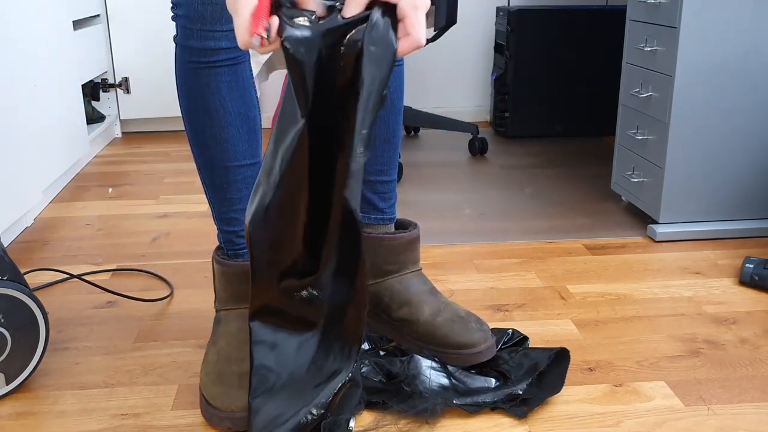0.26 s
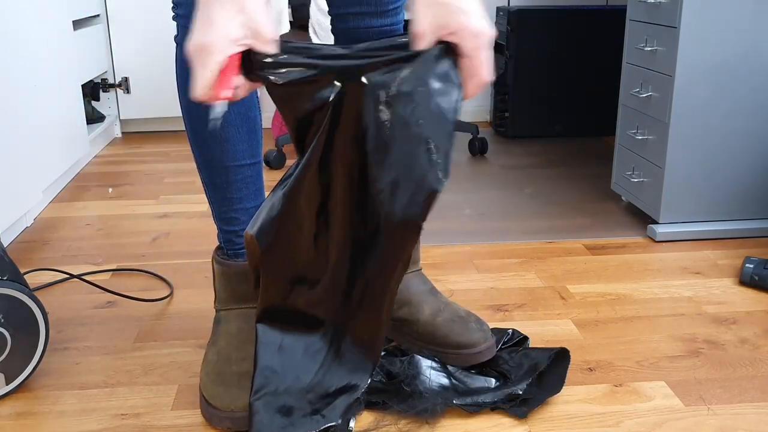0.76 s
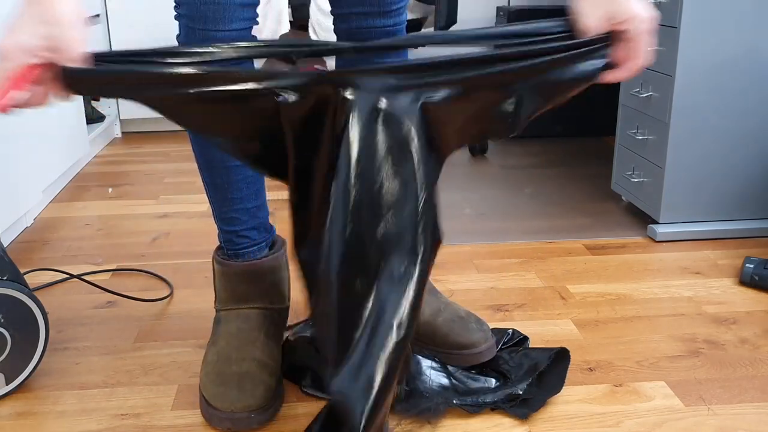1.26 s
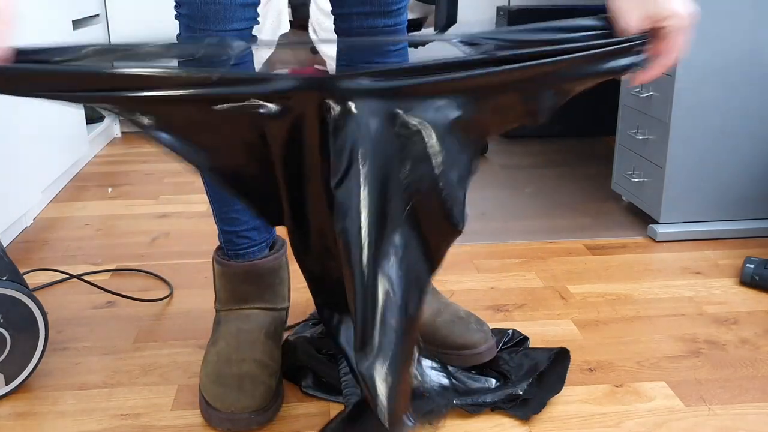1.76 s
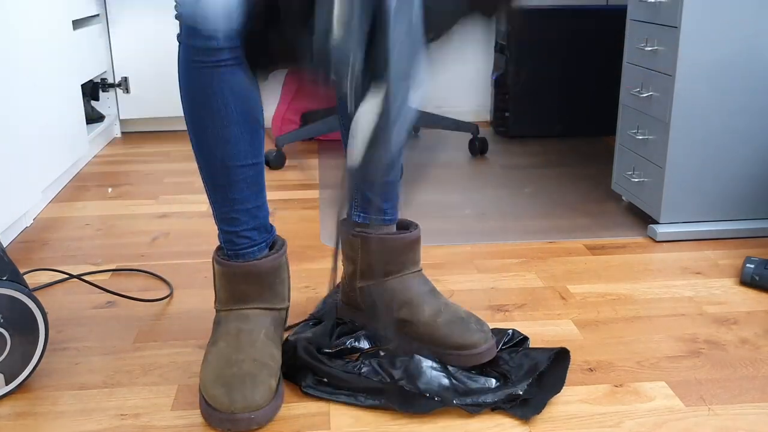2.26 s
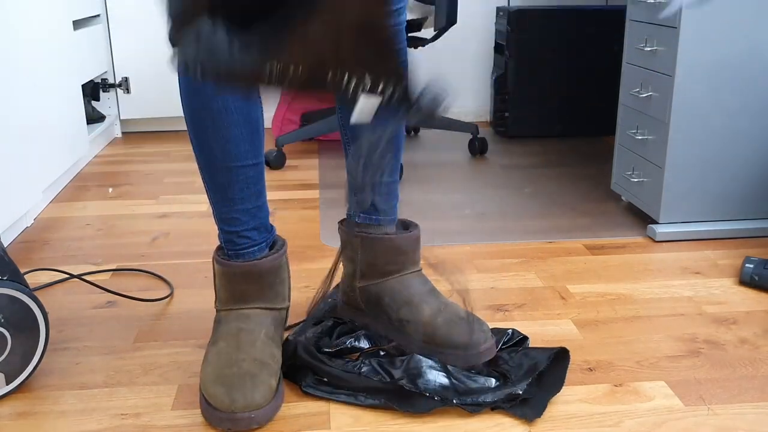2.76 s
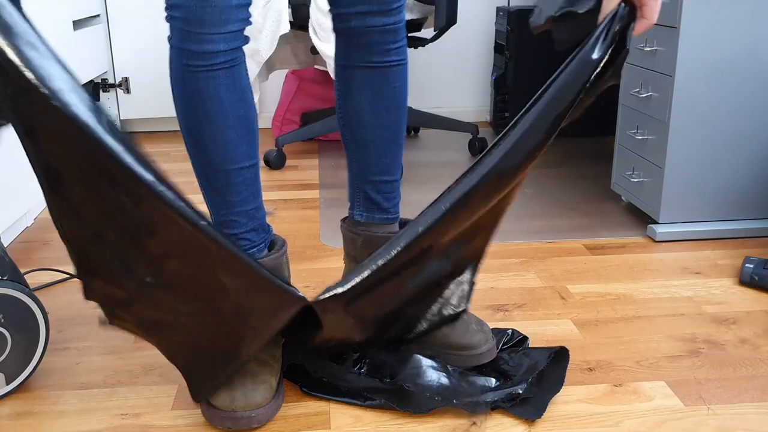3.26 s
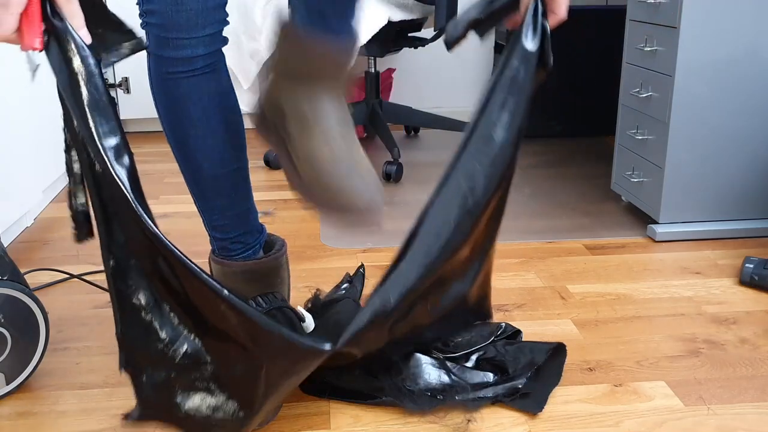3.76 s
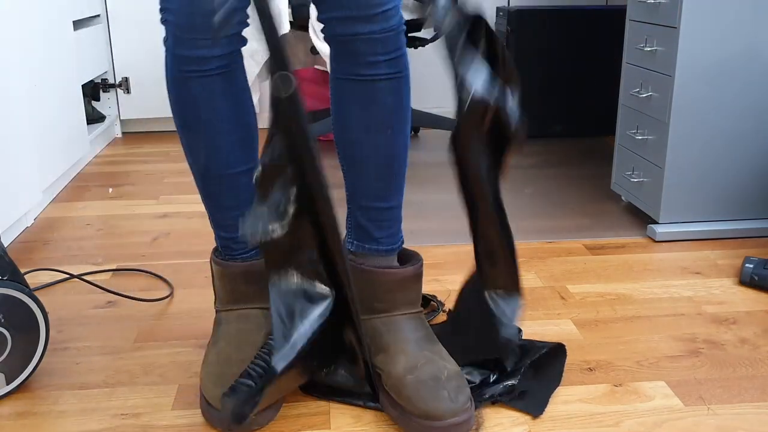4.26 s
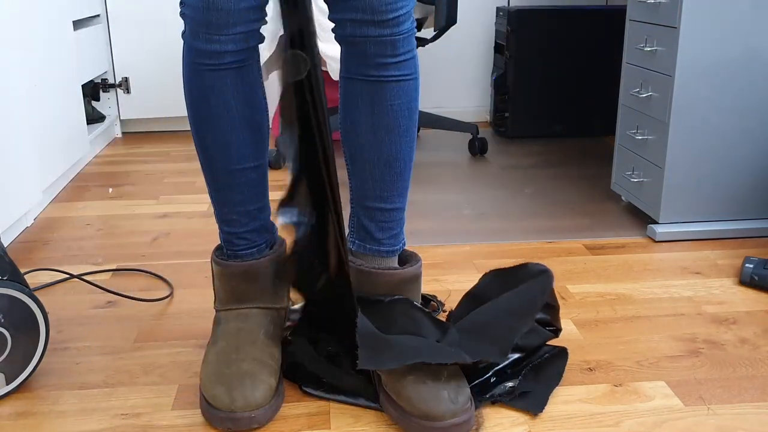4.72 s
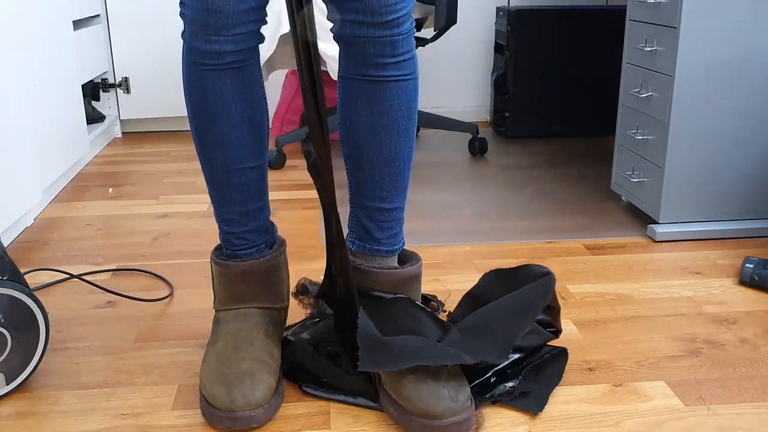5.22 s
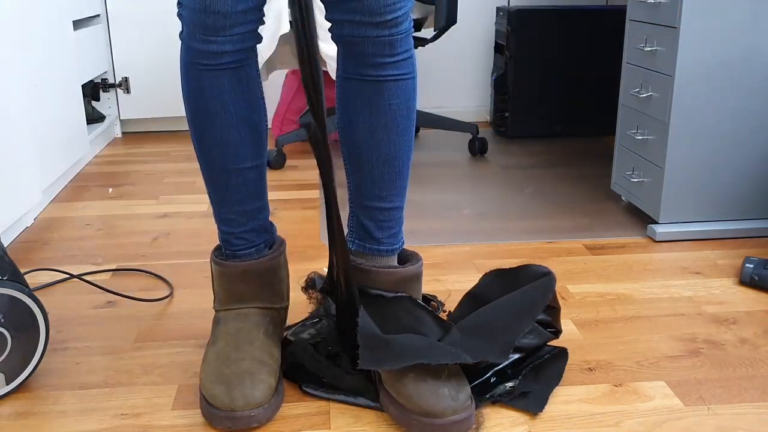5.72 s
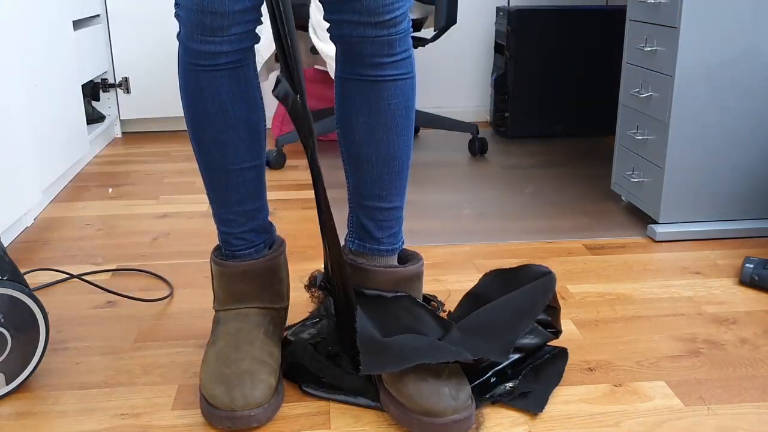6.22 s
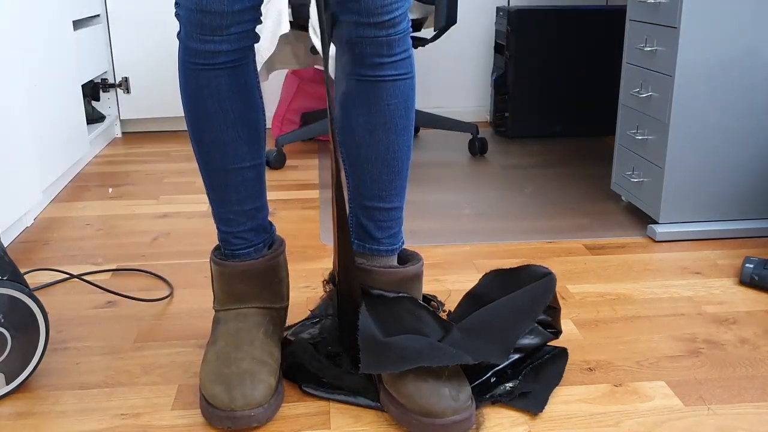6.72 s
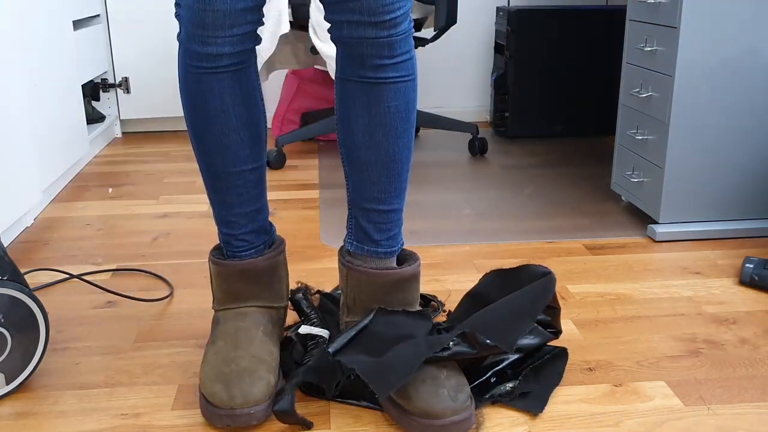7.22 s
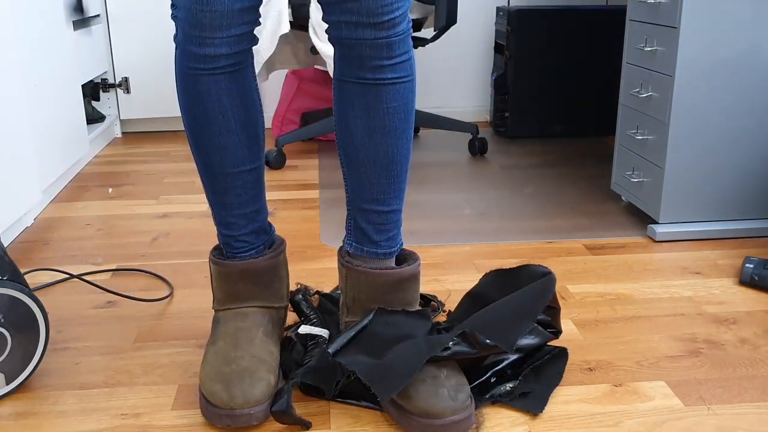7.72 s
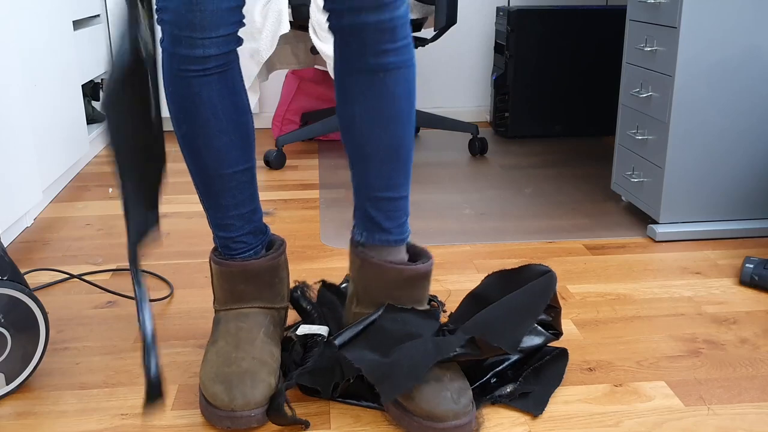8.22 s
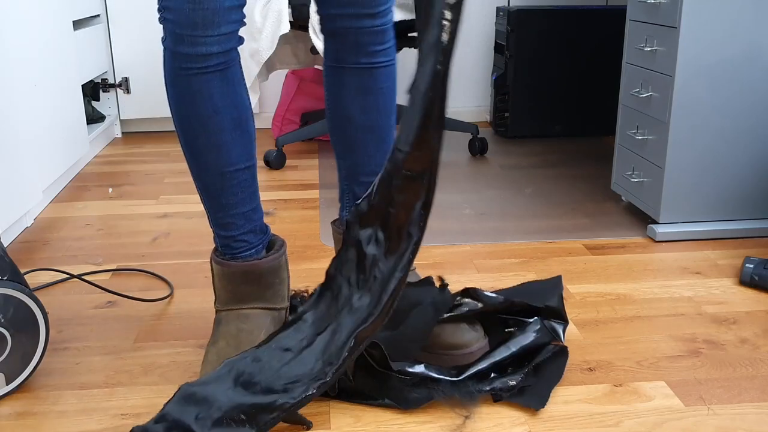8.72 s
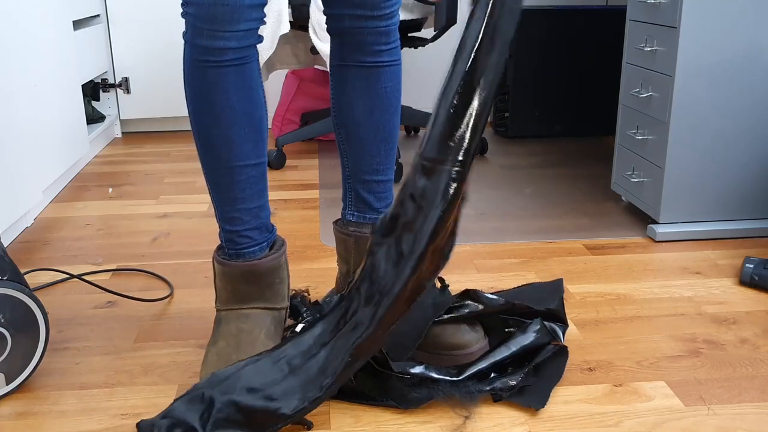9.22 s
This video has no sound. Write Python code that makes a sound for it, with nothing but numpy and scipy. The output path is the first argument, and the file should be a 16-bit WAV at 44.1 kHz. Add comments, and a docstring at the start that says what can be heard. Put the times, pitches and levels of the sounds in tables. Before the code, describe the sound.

Close stereo pickup in a small quiet room. Taut shiny fabric tears in several quick, bright, raspy rips with sharp snaps, then pauses with faint rustling. A boot thuds softly on floorboards, and a seam is pulled apart in dense, uneven cracks that thin out. A few creaky tugs lead to a last hard rip, followed by near silence and light cloth rustles and flicks.

```python
"""In a small, quiet room with a wooden floor, shiny coated fabric is ripped apart by hand.
Rips and seams: dense random thread clicks filtered by the taut sheet. Snaps: single millisecond noise bursts.
Folds flick as short band-passed pops; loose cloth rustles as clumped clicks.
Two faint soft knocks and a boot thud are decaying sines; low floor boom follows the pulls.
Reflections, standing waves and steady air noise make the room."""
import sys
import numpy as np
from scipy import signal
from scipy.fft import rfft, irfft
from scipy.io import wavfile
from scipy.ndimage import map_coordinates

SR = 44100
rng = np.random.default_rng(int(sys.argv[2]) if len(sys.argv) > 2 else 0)


def transcribe(signal):
    """Save signal, clipped to [-1, 1], as a 16-bit WAV file at the path in sys.argv[1]."""
    frames = np.atleast_2d(signal).T
    limited = np.clip(frames, -1, 1)
    pcm = np.round(limited * 32767).astype(np.int16)
    wavfile.write(sys.argv[1], SR, pcm)


N = 418068
TIME_S = np.arange(N) / SR

# Levels in the tables are relative; the layers apply further gains.
# room noise spectrum: freq_hz, level_db
AIR_SPECTRUM = [(12, -42), (20, 2), (65, -3), (124, -14.5), (224, -23), (440, -17), (599, -6.5),
                (863, -21.5), (1320, -13.5), (2440, -20), (6170, -22.5), (8170, -35), (9670, -34),
                (14700, -42.5), (16500, -55.5)]
# decay of the reflections: freq_hz, t60_s
ROOM_DECAY = [(100, 0.23), (260, 0.31), (700, 0.26), (1840, 0.27), (4850, 0.28), (12800, 0.23)]
# likeness of the reverberant sound and air, left to right: freq_hz, likeness_0_to_1
LEFT_RIGHT_LIKENESS = [(60, 0.68), (300, 0.65), (600, 0.49), (1200, 0), (4000, 0.0067), (14000, 0)]
# standing waves of the room: freq_hz, width_hz, gain_db
STANDING_WAVES = [(62, 1.7, 0.5), (182.3, 18, -9.5), (544, 65, -12.5)]
# microphone colour: freq_hz, gain_db
MICROPHONE = [(20, -11.5), (42, 1.5), (5200, -1), (6800, 1), (7900, -3), (10000, 0), (16000, 0)]
# two faint soft knocks, then a boot thud: start_s, level_db
KNOCKS_AND_THUD = [(2.93, -44.5), (3.063, -41), (4.034, -16)]
# modes of the floorboards: freq_hz, level_db, t60_s
FLOORBOARDS = [(66, -26, 0.14), (191, -6.5, 0.033), (388, 10.5, 0.014), (498, -7, 0.016)]
# loose cloth sliding and creasing: fastest_s, build_s, fade_s, creases_db, rasp_re_creases_db,
# flutter_re_creases_db
RUSTLES = [(0.2, 0.44, 0.071, -49.5, -5, -13), (0.38, 0.08, 0.22, -47, 0, -12),
           (0.6, 0.099, 0.12, -51.5, -1, -2), (2.72, 0.13, 0.18, -60.5, -1, 1.5),
           (2.98, 0.42, 0.21, -55.5, -2, -1.5), (3.37, 0.067, 0.19, -54.5, -2.5, -10.5),
           (3.93, 0.093, 0.18, -47, 7, -4.5), (4.08, 0.14, 0.06, -42, -1.5, 6),
           (5.56, .04, 0.2, -52.5, -6, -4.5), (5.98, 0.073, 0.19, -37.5, -6.5, -17),
           (6.27, 0.033, 0.066, -33.5, -8.5, -14), (7.11, 0.17, 0.15, -51.5, -9.5, -13),
           (7.41, 0.15, 0.091, -58.5, -11, -20), (7.52, 0.068, 0.044, -59.5, -2, -13),
           (8.151, 0.14, 0.34, -63.5, 7, -1.5), (8.39, 0.23, 0.086, -48.5, -5.5, -6),
           (8.559, 0.057, 0.15, -55.5, -0.5, 0.5), (9.12, 0.022, 0.16, -60, -6, -6),
           (9.23, 0.034, 0.19, -54, 2, -0.5), (9.409, 0.065, 0.03, -34, -1, -8.5)]
# spectrum of creasing cloth: freq_hz, level_db
CREASING_SPECTRUM = [(35, -32.5), (60, -4.5), (140, -15), (384, -3.5), (432, -3.5), (777, -5), (854, -5),
                     (1610, -5), (6010, -14), (7960, -22), (15000, -27.5), (16500, -42.5)]
# folds flicking over or jerking taut: start_s, level_db, centre_hz
FLICKS = [(0.344, -40, 2200), (0.634, -16.5, 1007), (1.101, -14.5, 980), (1.746, -15.5, 520),
          (3.064, -36, 894), (3.421, -37, 840), (3.946, -19, 920), (4.155, -14, 770), (6.494, -10.5, 780),
          (7.972, -43.5, 2700), (8.047, -35, 1600), (8.315, -31, 2400), (9.102, -41.5, 1560),
          (9.203, -22.5, 1600), (9.358, -22.5, 1300), (9.371, -19, 1300)]
# stitches and strong threads bursting: start_s, level_db, rasp_re_crack_db
SNAPS = [(0.498, -32, -19), (0.635, -11.5, -16), (0.6714, -16, -6), (0.6995, -13.5, -6), (0.7192, -13, -1),
         (1.0935, -21.5, -12), (1.1005, -12, -4), (1.1505, -15.5, 0), (1.518, -16.5, -6), (1.7185, -14, -1),
         (1.746, -7.5, -1), (1.864, -6.5, -15), (1.893, -3.5, -25), (2.0631, -7.5, -17.5),
         (2.0856, -3.5, -16), (2.1025, -4.5, -22), (2.501, -7.5, -15), (2.5551, -9.5, -20),
         (4.0637, -13.5, -7), (4.153, -2.5, -15), (4.1787, -17, -14), (4.2258, -15, 6.5),
         (4.2665, -12.5, -8), (4.343, -7.5, -1.5), (4.378, -8, -5.5), (4.4277, -7, -7.5), (4.4531, -5, -7),
         (4.5089, -8.5, -5), (4.5416, -11.5, 0), (4.566, -5.5, -9), (4.6073, -8.5, -2.5), (4.626, -4, -2.5),
         (4.6587, -6.5, -19), (4.691, -3.5, -17), (4.7067, -14.5, 4.5), (4.723, -13, -11),
         (4.7474, -6.5, -7.5), (4.7656, -16.5, 3.5), (4.7874, -11, -18), (4.805, -11, -9),
         (4.8204, -11, -7.5), (4.8663, -2.5, -7.5), (4.9075, -6.5, -6), (4.9641, -1, -14),
         (5.022, -10.5, -10), (5.0766, -6, -11), (5.105, -22, -14), (5.2167, -3.5, -10), (5.4193, -15, -8),
         (5.503, -15, -4), (5.683, -30, 4), (5.7248, -13.5, -8), (5.7842, -28.5, 1), (5.817, -30, 4),
         (5.857, -24, -6), (5.8717, -26.5, 5.5), (5.892, -6, -15.5), (6.0421, -11, -1.5),
         (6.2194, -28, 1.5), (6.255, -18, -18.5), (6.3947, -10.5, -9.5), (6.4242, -11.5, 0.5),
         (6.494, -5.5, -7), (6.5399, -0.5, -15), (6.662, -4, -8.5), (6.822, -4, -3.5), (6.8386, -10, -1)]
# spectrum of a bursting stitch: freq_hz, level_db
CRACK_SPECTRUM = [(40, -31), (200, -15.5), (700, -16), (1200, -17), (1600, -12.5), (2150, -8), (2700, -5.5),
                  (3900, 3.5), (6400, 4.5), (8200, -2), (15000, -6.5)]
# slow tears along a seam: start_s, length_s, threads_db, rasp_re_threads_db, flutter_re_threads_db,
# floor_boom_db
SEAMS = [(4.159, 0.19, -24.5, -4, -15, -54), (4.342, 0.26, -27.5, 1, -2.5, -46),
         (4.624, 0.18, -29, -2, -2, -44), (4.875, 0.063, -31.5, -20, -2.5, -45.5),
         (4.963, 0.068, -28.5, -2, -7.5, -45), (5.078, .11, -25.5, -9.5, -16.5, -40.5),
         (5.222, 0.036, -33.5, -20, -8.5, -40), (5.696, 0.23, -45.5, 1, -15, -64),
         (5.896, 0.03, -24, -10, -29.5, -51), (6.037, 0.065, -22, -24, -14, -43),
         (6.39, 0.17, -25.5, -14, -10, -51), (6.542, 0.051, -16.5, -13.5, -15, -38)]
# spectrum of a seam coming apart: freq_hz, level_db
UNPICKING_SPECTRUM = [(65, -33.5), (110, -4.5), (371, 0.5), (458, -1.5), (519, 0), (973, -5.5),
                      (1080, -5.5), (1680, -2.5), (6420, -8), (8090, -13.5), (15200, -13.5), (16500, -36.5)]
# fast rips across the sheet: start_s, length_s, threads_db, hardest_pull_0_to_1, rasp_re_threads_db,
# flutter_re_threads_db, floor_boom_db
RIPS = [(0.721, 0.21, -19, 0.53, -6, -13.5, -60.5), (1.145, .15, -20, 0.28, -9.5, -13, -53),
        (1.512, 0.089, -24, 0.1, -8, -14.5, -55), (1.717, 0.25, -18, 0.67, -11.5, -14, -56),
        (2.085, 0.19, -19.5, 0.2, -8.5, -11, -51), (2.493, 0.11, -31.5, .15, -10.5, -5, -49.5),
        (6.664, 0.17, -19, 0.53, -10, -11.5, -46.5), (6.818, 0.048, -19.5, 0.25, 1.5, -4, -32)]
# spectrum of the tearing weave: freq_hz, level_db
TEARING_SPECTRUM = [(24, -37.5), (40, -15.5), (201, -11.5), (245, -10.5), (386, -7), (1060, -4.5),
                    (1170, -1.5), (1580, -3.5), (5870, -4), (7950, -11.5), (14900, -16.5), (16500, -35.5)]
# gliding resonances during the first rip and the last two: time_s, pitch_hz, level_db
GLIDES = [
    [(0.727, 1500, -36), (0.775, 1250, -29.5), (0.83, 1020, -24), (0.88, 780, -39), (0.919, 620, -45)],
    [(6.67, 3100, -32.5), (6.76, 3250, -31), (6.815, 3100, -33), (6.84, 900, -31), (6.9, 620, -37)],
]

AIR_LEVEL_DB = -64
FLUTTER_HZ, RASP_HZ = 750, 2200  # flutter below, rasp between, crack above
EDGE_HZ = 16100  # band limit
# slack before and after a rip's hardest pull; rasp and flutter follow a share of it
RIP_BUILD_DB, RIP_RUN_OUT_DB, RIP_RUN_OUT_POWER, SHEET_FOLLOWS = 9.5, 11.5, 2.2, 0.99
SEAM_SAG_DB = 4.5  # tension lost over one tear
# drop one build before and one fade after the fastest moment; the power rounds the top
RUSTLE_DEPTH_DB, RUSTLE_POWER = 10.5, 1.09
# the floor lags a tug; moving loose cloth shifts weight in proportion to its flutter
FLOOR_LAG_S, SHIFT_DB = 0.034, -10


def amp(db):
    """Decibels to gain."""
    return 10 ** (np.asarray(db) / 20)


def unit(x):
    """Scales to rms 1."""
    return x / np.sqrt(np.mean(x ** 2) + 1e-20)


def read(points, hz):
    """Joins points by straight lines on a log-frequency axis."""
    f, value = np.transpose(points)
    return np.interp(np.log(hz + 1), np.log(f + 1), value)


def add(mix, start_s, sound):
    """Adds a sound to the mix in place, cut at the end of the mix."""
    part = mix[..., max(round(start_s * SR), 0):][..., :sound.shape[-1]]
    part += sound[..., :part.shape[-1]]


def wander(hz):
    """Random drift of rms 1: noise low-passed near hz."""
    f = np.fft.rfftfreq(N, 1 / SR)
    return unit(irfft(rfft(rng.standard_normal(N)) / (1 + (f / hz) ** 4), N))


def level(time_s, db):
    """Gain along a dB curve, practically silent outside it."""
    return amp(np.interp(TIME_S, time_s, db, left=-200, right=-200))


def pair(z, hz):
    """Mixes two unrelated spectra to the likeness of diffuse sound at two microphones."""
    same = np.clip(read(LEFT_RIGHT_LIKENESS, hz), -1, 1)
    return np.array([z[0], same * z[0] + np.sqrt(1 - same ** 2) * z[1]])


def shake(x, hz, width_hz):
    """Resonance that follows the pitch hz: shift down to zero, smooth twice, shift back; rms 1."""
    turn = np.exp(2j * np.pi * np.cumsum(hz * np.ones(N)) / SR)
    pole = np.exp(-np.pi * width_hz / SR)
    smooth = signal.lfilter([1], np.poly([pole, pole]), x / turn)
    return unit((turn * smooth).real)


def hollow(x, hz, width):
    """Keeps the band in which a patch of taut cloth sounds; width is a share of hz."""
    edges_hz = np.array([1 / np.sqrt(1 + width), np.sqrt(1 + width)]) * hz
    return signal.sosfilt(signal.butter(2, edges_hz, "band", fs=SR, output="sos"), x)


def crackle(per_s, spread_db, clump_db, clump_hz, densest=2.1):
    """Random clicks, a few much larger than the rest, in clumps of limited strength; rms 1."""
    sizes = amp(spread_db * np.minimum(rng.exponential(1, N), 4)) * rng.choice([-1, 1], N)
    breaks = rng.random(N) < per_s / SR
    clumps = amp(clump_db * np.minimum(wander(clump_hz), densest))
    return unit(sizes * breaks * clumps)


def strengths(db, rasp_db, flutter_db):
    """Gains of the crack, the rasp and the flutter."""
    return amp([db, db + rasp_db, db + flutter_db])


def sheet(pushes, spectrum, size=4096):
    """The cloth's causal answer to three rows of pushes: crack in the treble, rasp in the middle, flutter below."""
    hz = np.abs(np.fft.fftfreq(size, 1 / SR))
    log_gain = np.log(amp(np.maximum(read(spectrum, hz), -90)))
    answer = np.exp(np.conj(signal.hilbert(log_gain)))  # minimum phase
    low = 1 / (1 + (hz / FLUTTER_HZ) ** 6)
    middle = 1 / (1 + (hz / RASP_HZ) ** 6)
    shares = np.array([1 - middle, middle - low, low])
    energy = np.mean(shares * abs(answer) ** 2, axis=1, keepdims=True)
    taps = np.fft.fftshift(np.fft.ifft(shares * answer / np.sqrt(energy)).real, axes=1)
    return signal.oaconvolve(pushes, taps, axes=1)[:, size // 2:][:, :N].sum(0)


def held(length_s, rise_s, fall_s):
    """A pull takes hold and lets go: its progress 0-1 and its gain."""
    t = np.arange(0, length_s + 2 * fall_s, 1 / SR)
    grip = np.clip(t / rise_s, 0, 1)
    release = np.clip((length_s - t) / (2 * fall_s) + .5, 0, 1)
    return np.minimum(t / length_s, 1), grip * release


def air():
    """Steady rumble and hiss of the quiet room: shaped stereo noise."""
    hz = np.fft.rfftfreq(N, 1 / SR)
    noise = pair(rfft(rng.standard_normal((2, N))), hz)
    return amp(AIR_LEVEL_DB) * unit(irfft(noise * amp(read(AIR_SPECTRUM, hz)), N))


def standing_waves(x):
    """The room rings on at a few low pitches."""
    return x + sum(amp(gain_db) * signal.lfilter(*signal.iirpeak(hz, hz / width_hz, SR), x)
                   for hz, width_hz, gain_db in STANDING_WAVES)


def room_answer(onset_s=0.00033):
    """Dense reflections at both microphones, dying band by band; each side has unit energy."""
    size = SR // 2
    taps = rng.choice([-1., 1.], (2, size)) * (rng.random((2, size)) < .2)
    hz, t, z = signal.stft(taps, SR, nperseg=256)
    z = pair(z.transpose(0, 2, 1), hz) * amp(-60 * t[:, None] / read(ROOM_DECAY, hz))
    tail = signal.istft(z.transpose(0, 2, 1), SR, nperseg=256)[1][:, :size]
    tail = tail * np.clip(TIME_S[:size] / onset_s, 0, 1)
    return tail / np.linalg.norm(tail, axis=1, keepdims=True)


def reflections(x, count=8):
    """Sound leaves now here, now there, fading between places that each have their own reflections."""
    place = np.cumsum(90 + 30 * wander(10)) / SR  # places per second: mean, rms drift
    out = np.zeros((2, N))
    for k in range(count):
        away = abs((place - k) % count - count / 2)
        share = np.cos(np.pi / 2 * np.minimum(away, 1))
        out += signal.oaconvolve((x * share)[None], room_answer(), axes=1)[:, :N]
    return out


def direct(x, lag_s=2.5e-5, sway_s=3e-5, sway_db=-2.0):
    """Straight path: as the tear moves about, the right side drifts in delay and the two sides in level."""
    side = wander(3.3)
    right = map_coordinates(x, [(TIME_S - lag_s - sway_s * side) * SR], order=3)
    return np.array([x, right]) * amp(sway_db / 2 * np.array([side, -side]))


def cloth_motion():
    """Crack, rasp and flutter gains: each move of the loose cloth speeds up, then slows down."""
    t = np.arange(0, N / SR, .002)
    power = np.zeros((3, len(t)))
    for fastest_s, build_s, fade_s, db, rasp_db, flutter_db in RUSTLES:
        away = np.maximum((fastest_s - t) / build_s, (t - fastest_s) / fade_s)
        swell = amp(-RUSTLE_DEPTH_DB * abs(away) ** RUSTLE_POWER)
        power += np.outer(strengths(db, rasp_db, flutter_db), swell) ** 2
    return np.array([np.interp(TIME_S, t, row) for row in np.sqrt(power)])


def tugs(width_hz=22):
    """Pulls and shifting cloth load the feet; the floor booms, as resonant noise, at the room's lowest note."""
    load = amp(SHIFT_DB) * cloth_motion()[2]
    for start_s, length_s, *_, floor_db in [*RIPS, *SEAMS]:
        add(load, start_s, np.full(round(length_s * SR), amp(floor_db)))
    keep = np.exp(-1 / (FLOOR_LAG_S * SR))
    lagged_load = signal.lfilter([1 - keep], [1, -keep], load)
    boom = shake(rng.standard_normal(N), STANDING_WAVES[0][0], width_hz)
    return lagged_load * boom * amp(-0.5)


def knocks_and_thud(rise_s=0.0036):
    """Two faint soft knocks, then a boot thud: the same decaying floorboard sines with a soft onset."""
    t, out = np.arange(SR // 2) / SR, np.zeros(N)
    ring = sum(amp(db - 60 * t / t60_s) * np.sin(2 * np.pi * hz * t) for hz, db, t60_s in FLOORBOARDS)
    thud = ring * (1 - np.exp(-t / rise_s))
    for start_s, db in KNOCKS_AND_THUD:
        add(out, start_s, amp(db) * thud / abs(thud).max())
    return out


def rustles():
    """Folds of loose cloth buckle and slide over each other: sparse, uneven clicks."""
    creases = crackle(per_s=1600, spread_db=4.5, clump_db=3.5, clump_hz=61.4)
    return sheet(cloth_motion() * creases * amp([[-1.5], [-1.5], [-3]]), CREASING_SPECTRUM)


def flicks(fade_s=0.0024, size=900):
    """A whole fold buckles at once: a hollow pop, lower for a larger fold."""
    t, out = np.arange(size) / SR, np.zeros(N)
    for (start_s, db, hz), push in zip(FLICKS, rng.standard_normal((len(FLICKS), size))):
        pop = hollow(push * np.exp(-t / fade_s), hz, width=1.0)
        add(out, start_s, amp(db + 15.5) * pop / np.linalg.norm(pop))
    return out


def seam_effort(rise_s, fall_s):
    """Crack, rasp and flutter gains: a seam gives at full tension, which eases as it opens."""
    out = np.zeros((3, N))
    for start_s, length_s, db, rasp_db, flutter_db, _ in SEAMS:
        done, gate = held(length_s, rise_s, fall_s)
        tension = gate * amp(-SEAM_SAG_DB * done)
        add(out, start_s, np.outer(strengths(db, rasp_db, flutter_db), tension))
    return out


def pops():
    """Between the big snaps, smaller stitches pop at random along the seam: sparse band-passed clicks."""
    rasp = seam_effort(rise_s=0.02, fall_s=.012)[1]
    clicks = crackle(per_s=170, spread_db=12.0, clump_db=-1.5, clump_hz=30)
    return rasp * amp(-10.5) * unit(hollow(clicks, hz=1900, width=0.43))


def snaps(burst_s=0.00079, fray_s=0.0022, fray_db=-24, flutter_db=-19, flatten=0.33, size=900):
    """A stitch swells and bursts within a millisecond; its last fibres fray on, weaker and longer."""
    t, pushes = np.arange(size) / SR, np.zeros((3, N))
    envelope = t / burst_s * np.exp(1 - t / burst_s) + amp(fray_db) * np.exp(-t / fray_s)
    fibres = rng.standard_normal((len(SNAPS), size)) * envelope
    spectra = rfft(fibres, 2 * size)
    fibres = irfft(spectra / abs(spectra) ** flatten)[:, :size]  # so brief a burst has no strong pitch
    for (start_s, db, rasp_db), snap in zip(SNAPS, fibres):
        add(pushes, start_s, np.outer(strengths(db, rasp_db, flutter_db), snap / np.linalg.norm(snap)))
    return sheet(pushes * amp([[13.5], [22], [14]]), CRACK_SPECTRUM)


def seams():
    """Along a seam the tear creeps: fewer, coarser breaks in clumps."""
    threads = crackle(per_s=2200, spread_db=4.5, clump_db=6.5, clump_hz=129)
    effort = seam_effort(rise_s=0.011, fall_s=.012)
    return sheet(effort * threads * amp([[-1.5], [-2], [-1]]), UNPICKING_SPECTRUM)


def rip_effort(rise_s=0.0054, fall_s=.01):
    """Crack, rasp and flutter gains: each rip swells to its hardest pull, then runs out ever faster."""
    out = np.zeros((3, N))
    for start_s, length_s, db, hardest, rasp_db, flutter_db, _ in RIPS:
        done, gate = held(length_s, rise_s, fall_s)
        hardest = np.clip(hardest, 0, .95)
        before = np.maximum(hardest - done, 0)
        after = np.maximum(done - hardest, 0) / (1 - hardest)
        slack_db = RIP_BUILD_DB * before + RIP_RUN_OUT_DB * after ** RIP_RUN_OUT_POWER
        swell = amp(-np.outer([1, SHEET_FOLLOWS, SHEET_FOLLOWS], slack_db))
        add(out, start_s, strengths(db, rasp_db, flutter_db)[:, None] * swell * gate)
    return out


def rips():
    """The tear breaks thousands of threads a second; in three rips they also excite gliding resonances."""
    threads = crackle(per_s=9000, spread_db=2.5, clump_db=5.0, clump_hz=250)
    glides = sum(level(time_s, db) * shake(threads, np.interp(TIME_S, time_s, hz), width_hz=1100)
                 for time_s, hz, db in map(np.transpose, GLIDES))
    return glides + sheet(rip_effort() * threads * amp([[-.7], [-1.5], [-1.3]]), TEARING_SPECTRUM)


def scene():
    """Cloth a little to the left, knocks and thud straight ahead, in the room; snaps beam more straight ahead."""
    cloth = rips() + seams() + rustles()
    cracks = snaps() + flicks() + pops()
    thuds = knocks_and_thud()
    near = direct(cloth * amp(-2.5) + cracks * amp(-3.0)) * amp([[-2.5], [-5]]) + thuds * amp(-1.5)
    far = reflections(cloth + cracks * amp(-4.0) + thuds * amp(-4.5)) * amp([[1.1], [-.8]])
    return standing_waves(near + far + air()) + tugs()


def record(dry):
    """Microphone colour, a soft ceiling on the peaks, then the band limit."""
    coloured = irfft(rfft(dry) * amp(read(MICROPHONE, np.fft.rfftfreq(N, 1 / SR))), N)
    limited = coloured / (1 + (coloured / .88) ** 6) ** (1 / 6)
    low_pass = signal.firwin(401, EDGE_HZ, window=("kaiser", 8), fs=SR)
    return signal.oaconvolve(limited, low_pass[None], "same")


dry = scene()
out = record(dry)
transcribe(out)
```